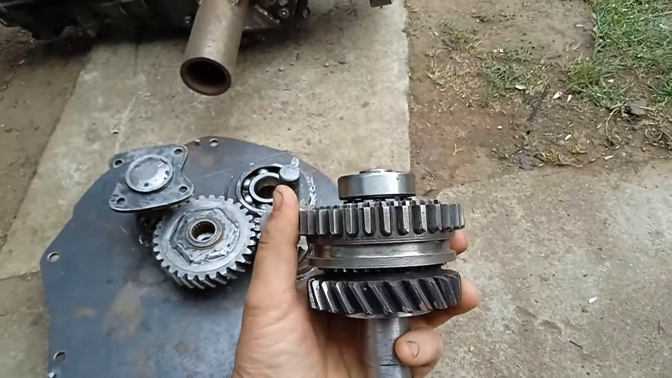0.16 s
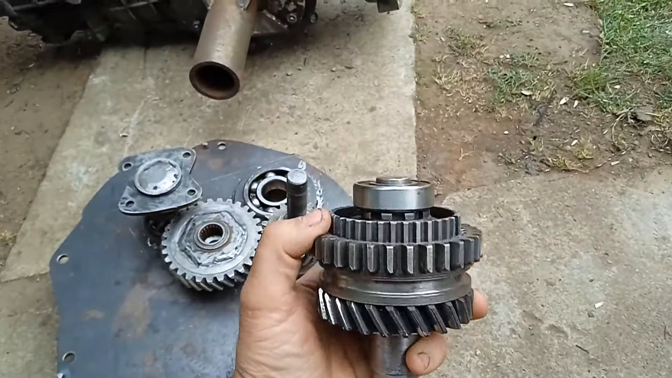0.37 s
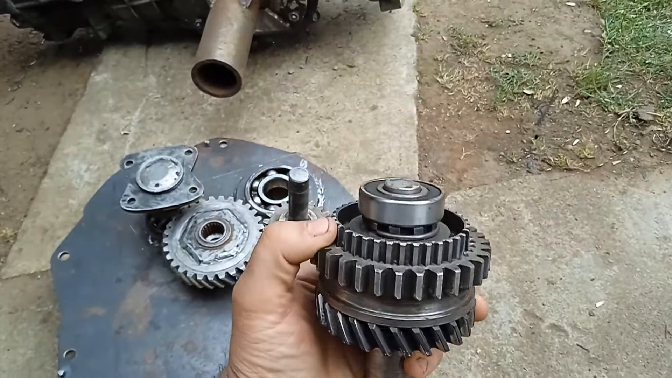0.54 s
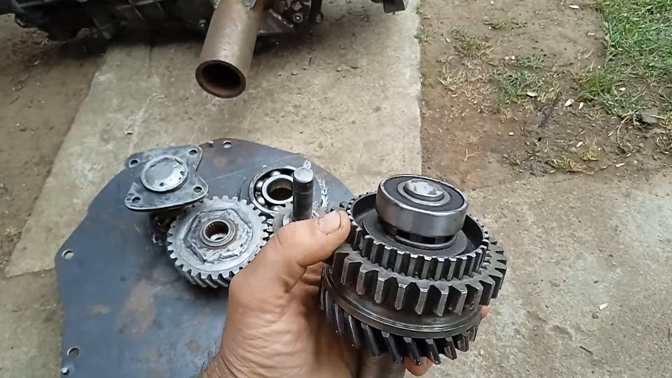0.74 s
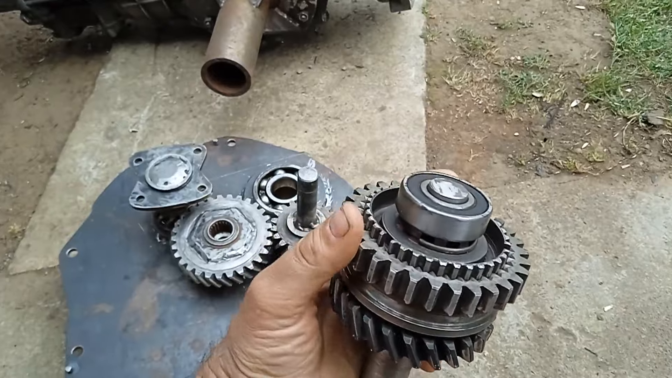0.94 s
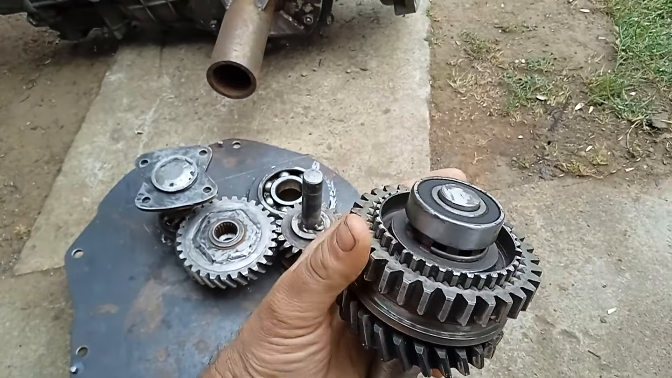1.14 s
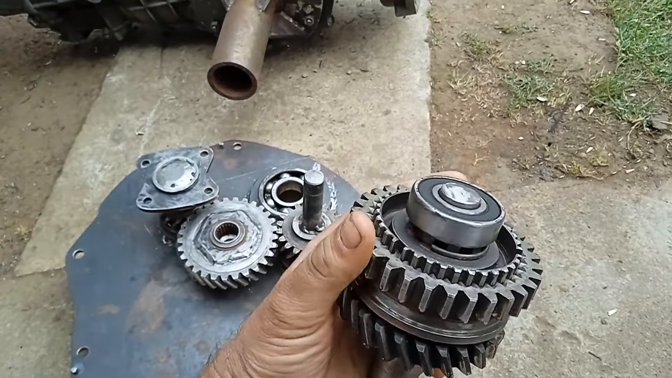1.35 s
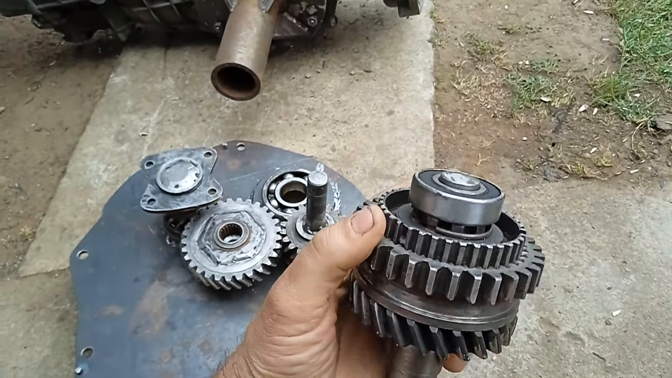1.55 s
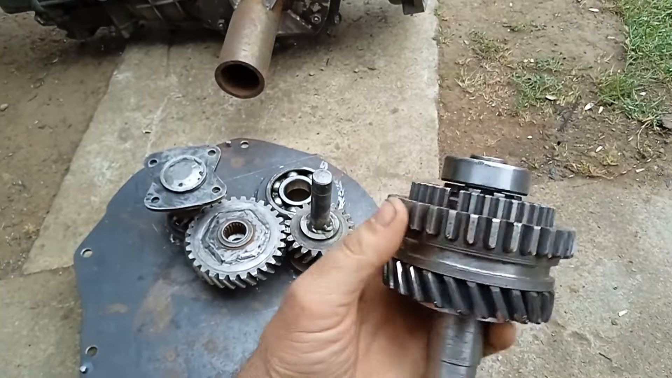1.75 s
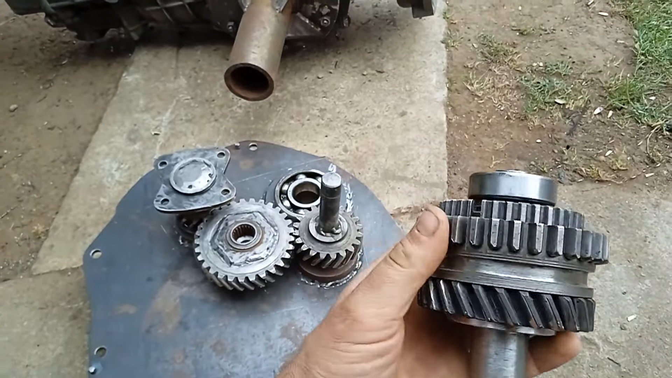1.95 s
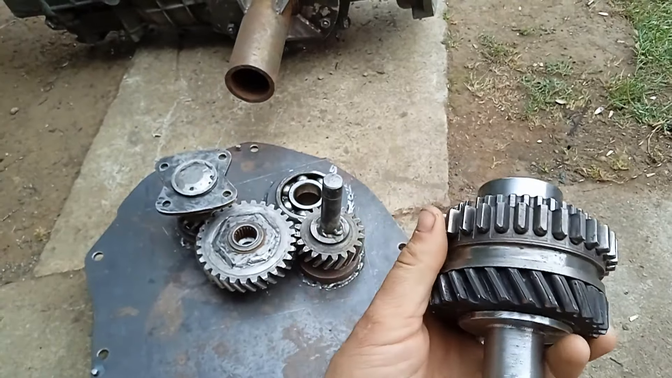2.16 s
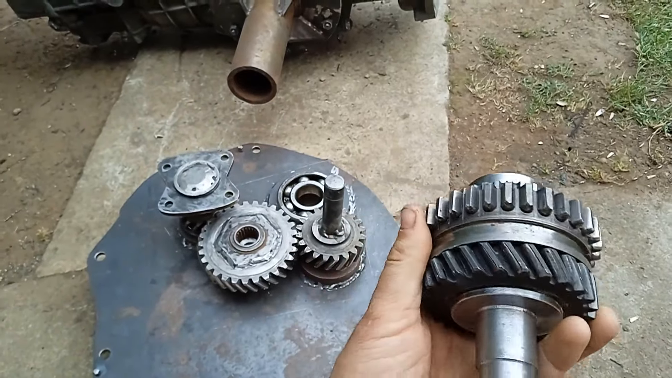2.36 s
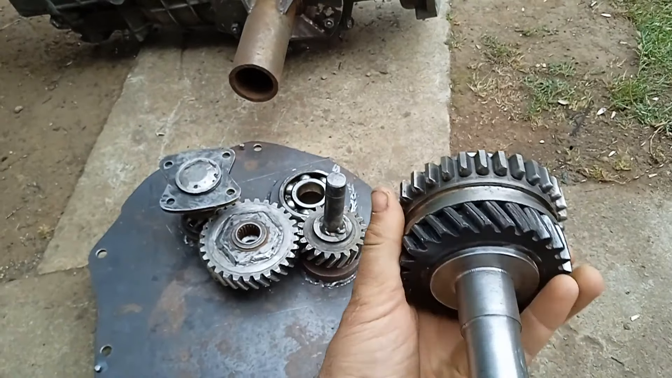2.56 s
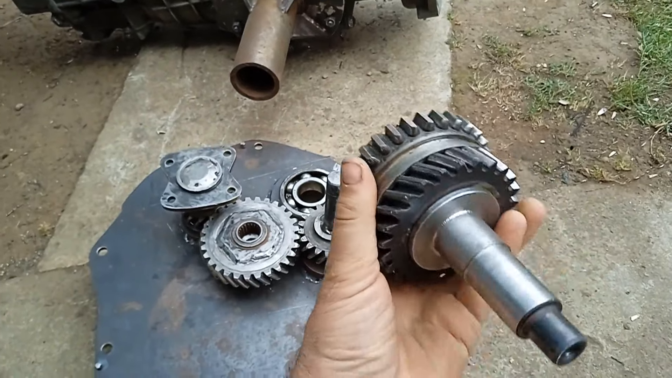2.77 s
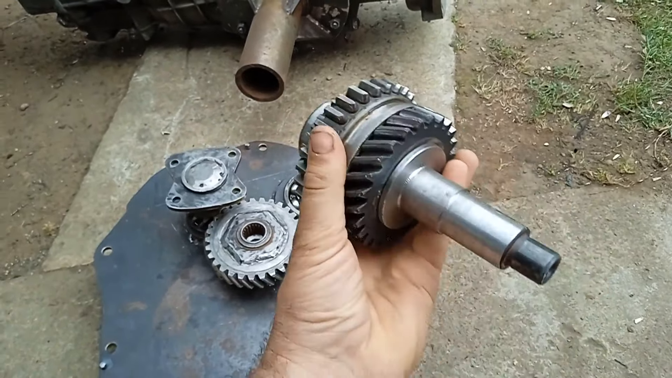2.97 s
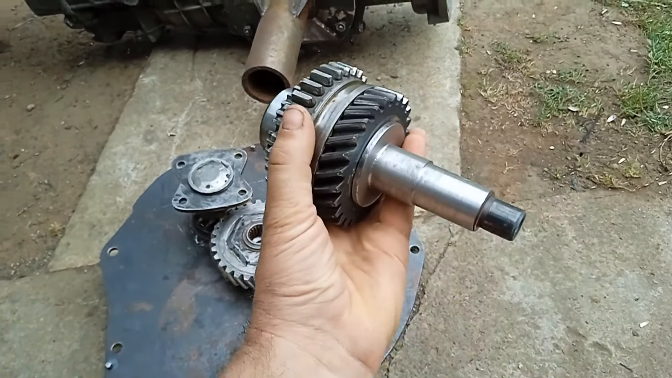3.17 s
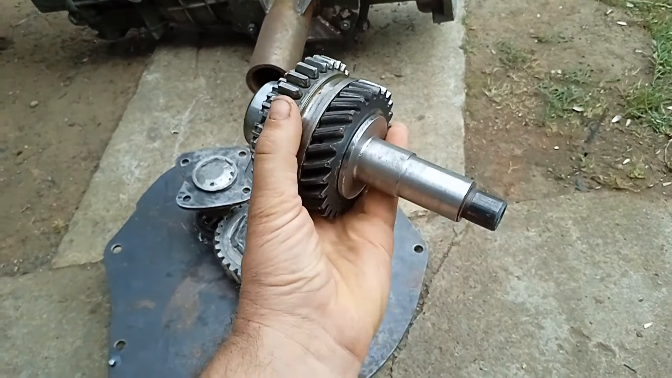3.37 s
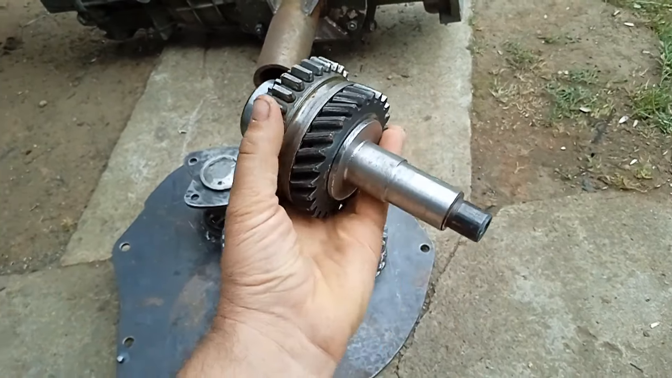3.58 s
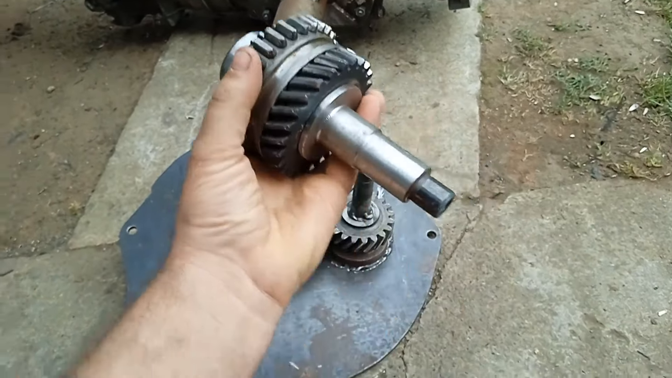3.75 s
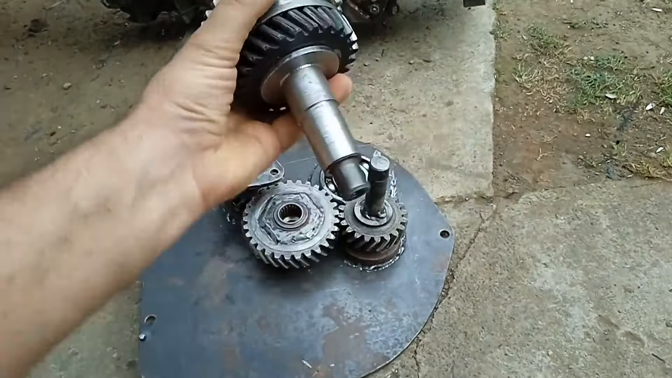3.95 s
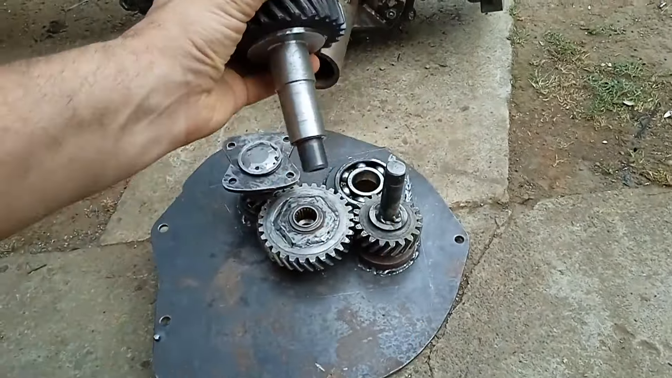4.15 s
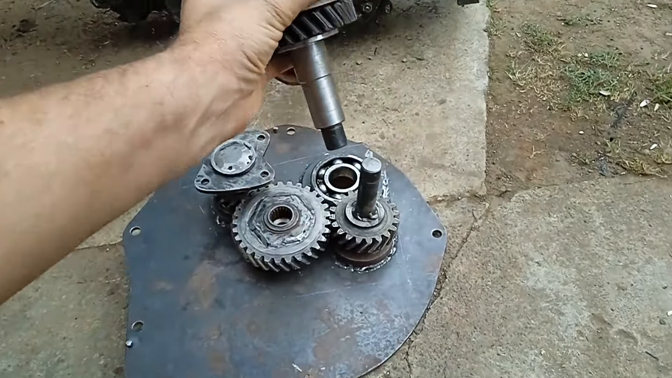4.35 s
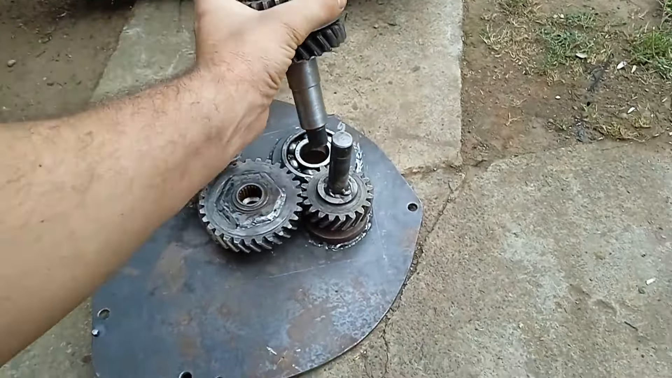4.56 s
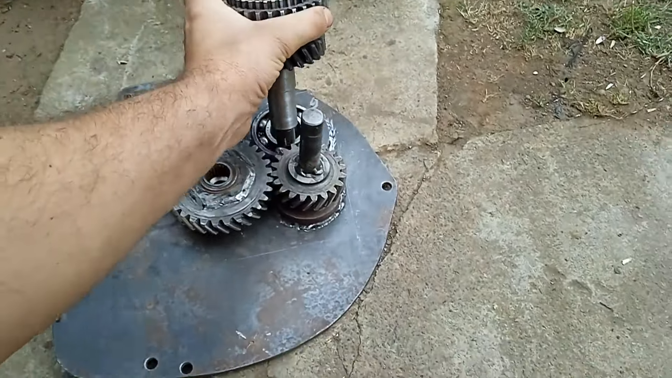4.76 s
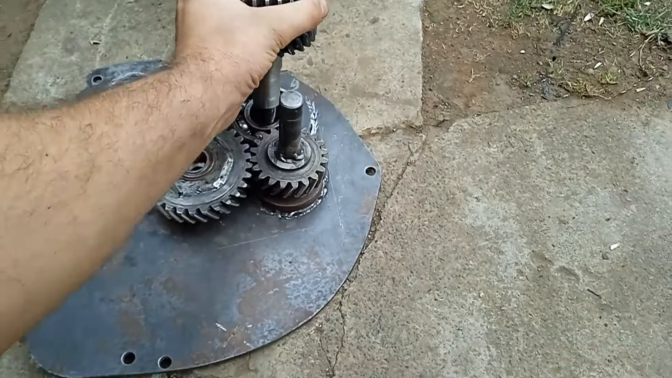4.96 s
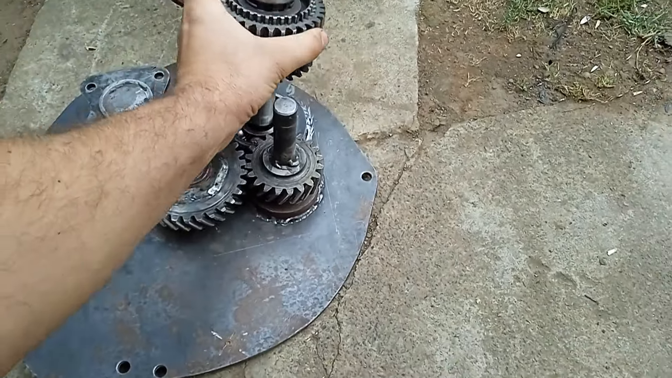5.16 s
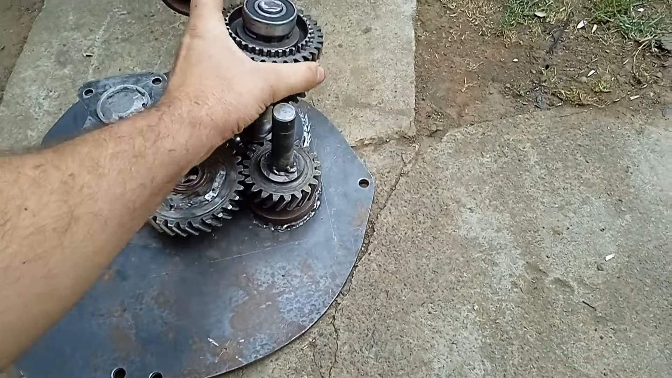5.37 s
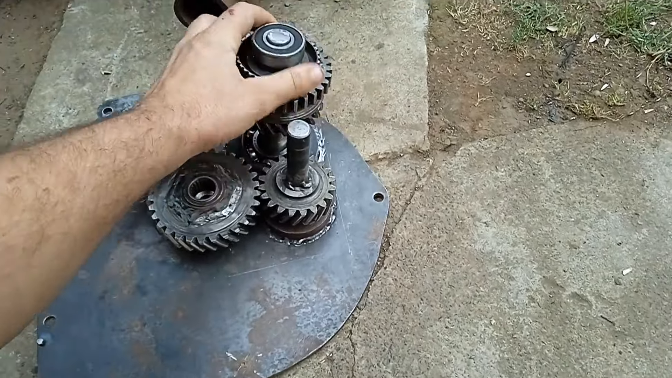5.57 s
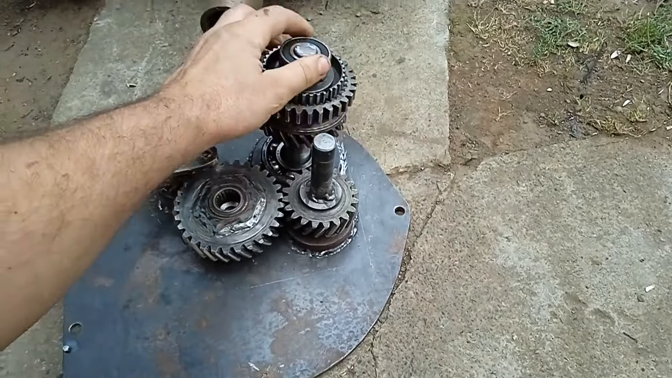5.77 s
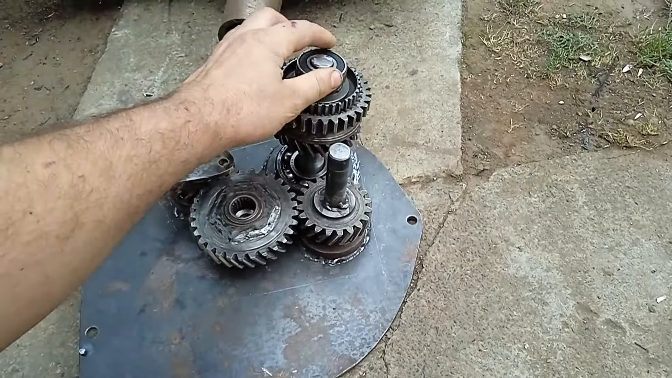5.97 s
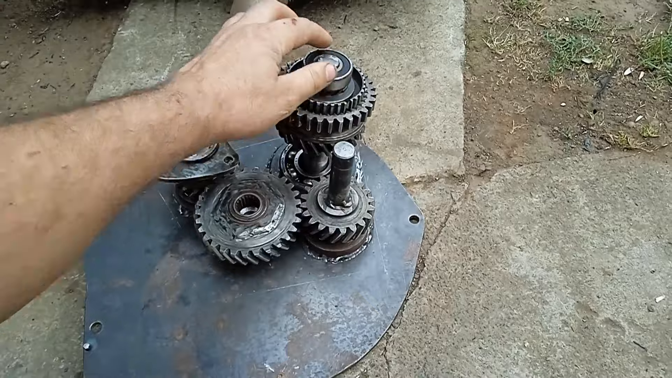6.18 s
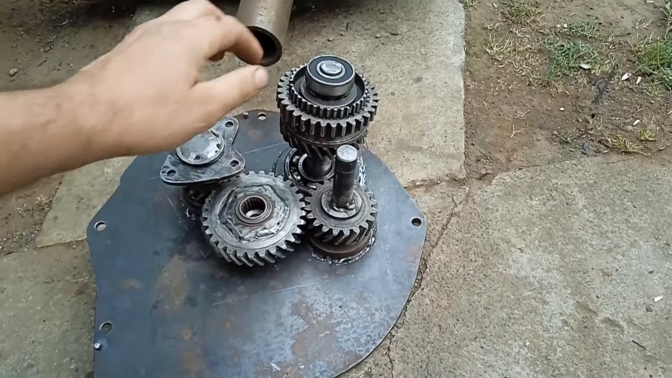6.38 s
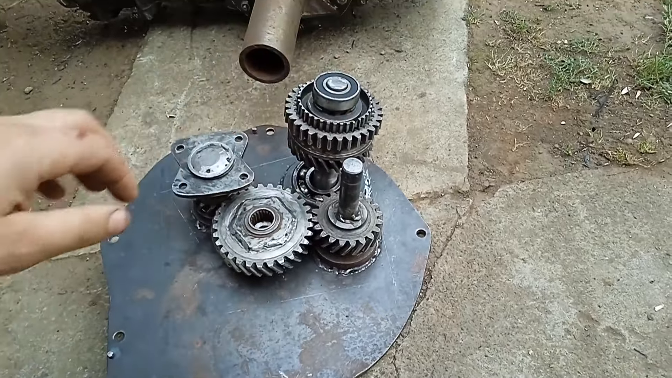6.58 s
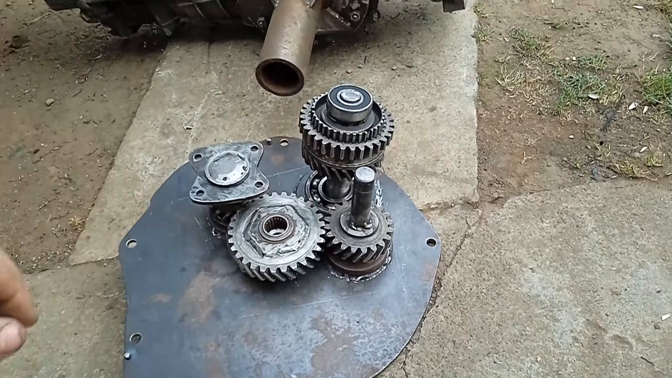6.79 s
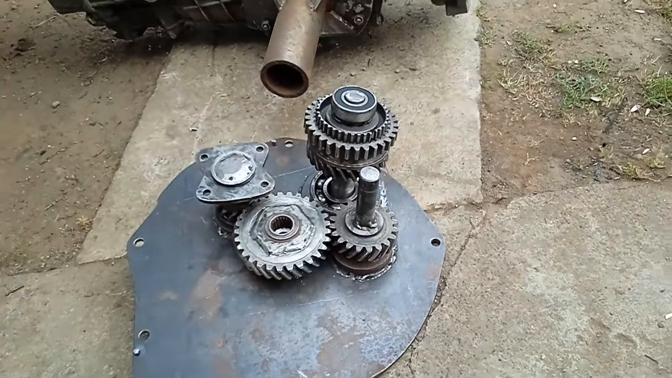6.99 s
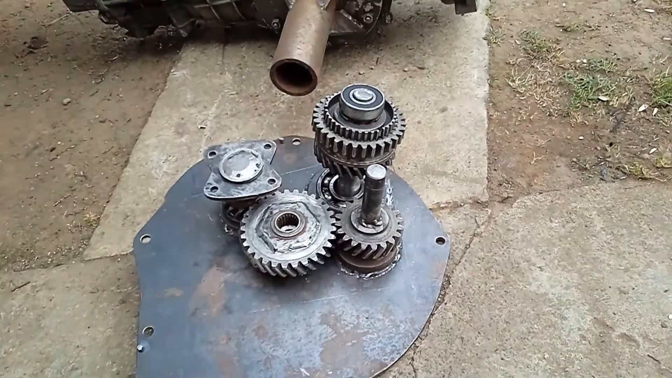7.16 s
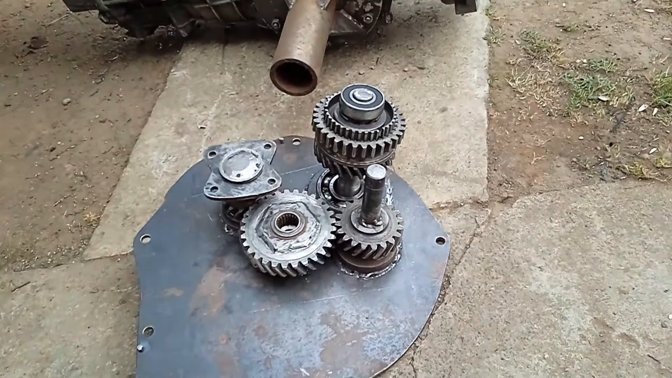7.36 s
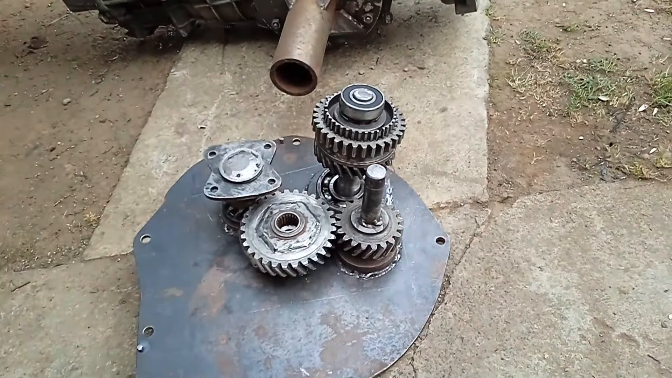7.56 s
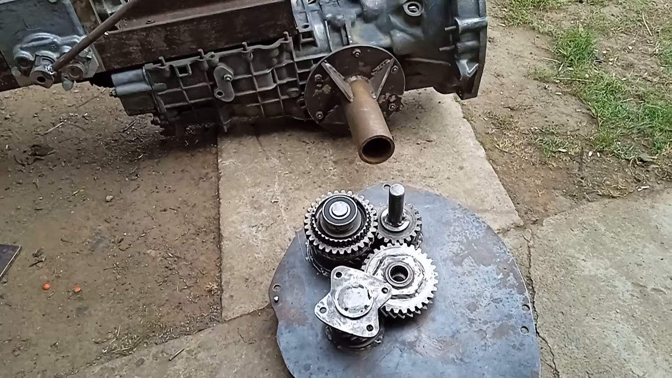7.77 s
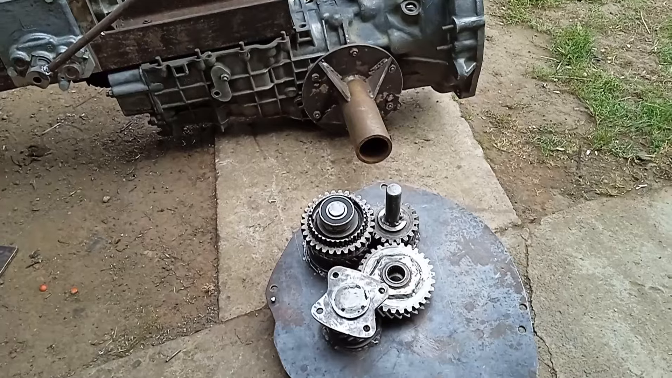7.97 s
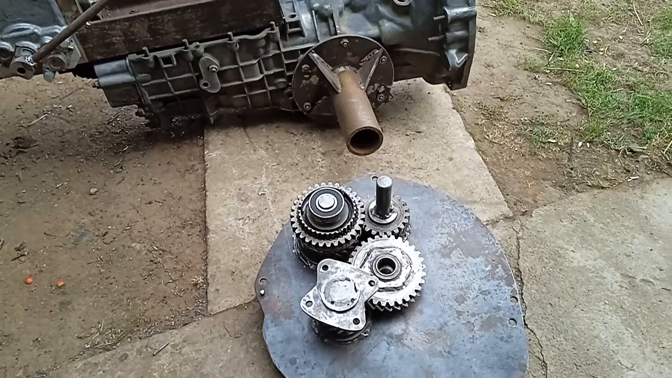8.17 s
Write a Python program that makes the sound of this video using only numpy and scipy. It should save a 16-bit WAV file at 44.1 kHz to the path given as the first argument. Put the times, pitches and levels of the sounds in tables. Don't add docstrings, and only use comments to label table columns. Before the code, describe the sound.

Outdoors, a heavy steel gear cluster clinks sharply in the hand, then its shaft knocks and grinds into a bearing on a steel plate; silence follows.

```python
import sys
import numpy as np
from scipy import signal
from scipy.fft import rfft, irfft
from scipy.io import wavfile

SR = 44100
rng = np.random.default_rng(int(sys.argv[2]) if len(sys.argv) > 2 else 0)


def boost(x):
    u = np.asarray(x, float) / 20
    return 10 ** u


def wrap_up_sound(samples):
    columns = np.atleast_2d(samples).T
    tamed = np.clip(columns, -1, 1)
    steps = np.round(tamed * 32767).astype(np.int16)
    wavfile.write(sys.argv[1], SR, steps)


N = 362805

# frequency in Hz, density in dB per Hz.
HISS_SPECTRUM = [(500, -22.5), (1100, -14), (1600, -5), (2300, -2), (4300, -7.5), (6100, -5.5),
                 (7300, -11.5), (8200, -25), (13300, -31), (15200, -24.5), (16300, -32)]
HUM_SPECTRUM = [(100, -9.5), (200, -1), (300, -2), (500, -4.5), (900, -5.5), (1300, -8.5), (2500, -36.5)]
WIND_SPECTRUM = [(25, -10), (50, -0.5), (90, 4), (150, -2), (250, -19), (500, -46.5)]
RUSTLE_SPECTRUM = [(3000, -31), (6000, 6), (8700, -15), (11000, -6.5), (13300, -13.5), (15200, 1.5),
                   (16300, -19.5)]
# time in seconds, level in dB.
FAR_HISS = [(0.0, -53), (.6, -55), (1.72, -58), (2.66, -62.5), (3.26, -62.5), (4.4, -64.5), (5.1, -64),
            (5.9, -67), (7.57, -66.5)]
# peak in seconds, level in dB.
HUM_SWELLS = [(.52, -61), (1.56, -68.5), (3.26, -68.5), (5.93, -68.5)]
# peak in seconds, level in dB, time to fall 20 dB in seconds.
GUSTS = [(.07, -51.5, 0.09), (.13, -56, 0.1135), (.515, -54, 0.0604), (.63, -65.5, 0.5),
         (2.09, -48.5, 0.0725), (2.25, -50, 0.082), (2.36, -64, 0.44), (2.69, -56, 0.1565),
         (2.92, -64, 0.2522), (3.07, -63.5, 0.1704), (3.29, -62.5, 0.0014), (4.09, -63.5, 0.1692),
         (4.83, -75, 0.5581), (5.8, -60.5, 0.4261), (6.055, -57.5, 0.4437), (7.11, -64, 0.1),
         (7.46, -67.5, 1.5)]
# middle in seconds, length in seconds, rustle level in dB, lift of the hiss in dB.
RUBS = [(2.6, 1, -72, 2.3975), (4.59, 0.3796, -70, 2.5), (5.482, 0.2698, -78.5, 2.5), (7.05, 0.4, -65, 2.5),
        (7.305, 0.28, -73, 1)]
# frequency in Hz, gain in dB.
MICROPHONE_COLOUR = [(300, -35.5), (1000, -19), (2300, 6.5), (4300, -2.5), (6100, 6), (8300, -16),
                     (11000, -20.5), (13300, -34.5), (15200, -12.5), (16400, -30.5)]
# start in seconds, peak in dB, t60 in seconds,
# tilt in dB per octave, rise in ms.
CRACKS = [(0.888, -34, 0.04166, -6, 3.368), (0.8897, -33.5, 0.01633, -1, 0.586),
          (1.461, -46.5, 0.2652, -1.5, 0.78), (1.843, -54.5, 0.117, -4.5, 0.62),
          (2.0251, -20.5, 0.02247, 2.5, 2), (2.0262, -13, .012, 2, .6), (2.03, -37, 0.20627, 0.5, 2.9),
          (3.233, -49, 0.2998, -0.5, 0.627), (4.597, -49.5, 0.1705, 3.5, 17.75),
          (5.036, -56.5, 0.2076, -9, 8), (5.069, -52.5, 0.0983, -17.5, 4.45),
          (5.624, -34.5, 0.0589, -8, 0.38), (5.742, -48.5, 0.13925, -4.5, 0.594),
          (5.7767, -38.5, 0.0383, -0.5, 1.3), (5.7915, -41, .03, -1, 0.6296),
          (5.7959, -36, 0.1298, -5.5, 1.56), (5.966, -56, 0.12, -8.5, 6), (6.026, -47, 0.15, -7.5, 1.5),
          (6.052, -46, 0.0474, 2.5, 2), (6.0585, -33, 0.0479, -7, 2.3),
          (6.0614, -34, 0.02205, -0.5, 0.5326), (6.1253, -37.5, 0.0433, -2, 1.5),
          (6.1297, -22.5, 0.01815, -1, 0.31), (6.131, -39.5, 0.1687, -2.5, 4.3),
          (6.209, -55, 0.2007, -12.5, 1.494)]
GEAR_HZ = [1985, 2315, 2590, 2950, 3170, 3400, 3432, 3470, 3595, 3700, 3852, 4800, 5150, 5383, 5455, 5487,
           5620, 5830, 6250, 6480, 6885, 8360, 8672, 8738, 8785, 10080, 10495, 10900, 11700, 12378, 13248,
           13660, 14590, 15190, 15662]
# level in dB within its family for a rim touch, full knock,
# landing and seated knock, then t60 in seconds.
GEAR_MODES = [(3.5, -12, 0, 3, .12), (-2, 0, -10, -7, .14), (0.5, -22, -10, -12, .058),
              (0, -20, -2, -13.5, .1), (-11, -14, -16, -16, 0.12), (-9, -8, 5, 0, 0.22),
              (0, -4.5, -2, 4.5, .25), (-7, -2.5, -3.5, -14.5, .25), (-4, -6, -17, -15.5, .24),
              (3.5, -7, -16, -11, .22), (-15.5, -12, -16, -13.5, .15), (-9, -18, -24, -21.5, .12),
              (12.5, -4, -16, -14.5, 0.1), (2.5, -10, -7, -1, 0.21), (1.5, -3, -12, 1, 0.2),
              (-9.5, 2, 0.5, -12, .25), (-10, -12, -10, -4, .1), (-10.5, -6, -18, -16, .1),
              (-16.5, -2, -9.5, -7.5, 0.12), (-11.5, -8, -16, -7, .11), (-8, -4, -20.5, -18, 0.13),
              (-23.5, -25, -20.5, -20.5, .088), (-14.5, -14, -12, -1, .12), (5, 4.5, -2, -9.5, .2),
              (0, -5, 0, -7.5, 0.14), (2.5, -12.5, -10, 0.5, 0.21), (-2, -0.5, -9, -9, .17),
              (-6.5, -10, -12, -6, .09), (-24, -24, -20, -12, .1), (-18, 3, -10.5, -13.5, .15),
              (-24, 2, -8, -20, 0.2), (-24, -2.5, -2, -28, 0.22), (-12, 4, -8, 2.5, .13),
              (-15, -16, -4, -4, .15), (-7, -9, 6, -4, .2)]
FAMILY_EDGES_HZ = [3000, 4300, 7500, 9500]
CONTACT_CHANGES_S = [1.5, 5.5, 6.1]
# start in seconds, then family strengths in dB near 3.5, 2, 5.5 and 8.7 kHz and on top.
CLINKS = [
    (0.8891, -31.5, -30, -36, -35.5, -45),
    (2.027, -19.5, -26, -28.5, -19.5, -23),
    (5.7968, -43, -61.5, -38, -69.5, -60.5),
    (6.0625, -41, -41.5, -27.5, -57, -57),
    (6.1265, -35, -54.5, -50, -55, -60),
    (6.1345, -27, -48, -39, -45, -50),
    (6.1305, -27, -40, -27, -28, -36),
]
# start in seconds, frequency in Hz, level in dB, t60 in seconds, rise in ms.
PINGS = [(2.011, 2086, -42, 0.08826, 1.368), (3.234, 4878, -42.5, 0.02755, 0.396),
         (3.58, 319.7, -65.5, 0.6363, 23.78), (5.038, 1737, -48.5, 0.0574, 5.113),
         (5.051, 1537, -37.5, 0.04583, 3.06), (5.055, 2971, -57.5, 0.0984, 5.43),
         (5.8, 179.7, -42.5, 0.0554, 2.68), (5.0735, 4920, -53.5, 0.05025, 4.47),
         (5.073, 451.6, -45, 0.0515, 6.71), (6.027, 1815, -34.5, 0.066, 3),
         (6.057, 2023, -28.5, 0.0603, 2.854), (6.21, 1510, -59.5, 0.3706, 16.66),
         (5.6235, 2900, -36, .05, 2), (5.624, 2460, -39, .09, 3), (5.625, 1590, -45, .14, 4),
         (5.623, 700, -44, .06, 2), (7.4742, 1900, -48, 0.01, 0.27), (5.748, 1900, -50, .1, 6),
         (2.0262, 3850, -17, .016, .8), (2.042, 2330, -36, .05, 3), (2.046, 5480, -36, .06, 3),
         (.908, 5420, -47, .07, 5), (6.129, 3750, -32, .04, 2), (6.026, 2600, -45, .07, 2),
         (6.026, 600, -40, .06, 3), (5.965, 3200, -52, .06, 3), (6.062, 700, -34, .08, 4),
         (6.212, 200, -48, .08, 4), (1.46, 653.1, -51.5, 0.05876, 2.615), (1.46, 951, -53.5, 0.0529, 2),
         (1.498, 697.2, -52, 0.02834, 1.848), (1.513, 724.2, -52, 0.0413, 2.79),
         (5.058, 297.5, -46, 0.03407, 1.91), (5.077, 4093, -52, 0.0301, 2.957),
         (5.072, 2095, -52, 0.02874, 2.963), (5.777, 6365, -34.5, 0.02285, 0.9),
         (5.7915, 6293, -38.5, .015, 0.989), (6.119, 2013, -39.5, 0.0438, 1.956)]
# time in seconds, peak in dB, pitch in Hz.
SKIN_TICKS = [(3.5944, -49, 3202), (4.4888, -42.5, 2349), (4.5004, -53, 2301), (4.5126, -53, 3309),
              (4.548, -52, 6271), (4.5282, -41, 6556), (4.556, -42.5, 6277), (4.6212, -44, 6587),
              (4.649, -44.5, 3113), (4.6765, -49, 3473), (4.68, -49.5, 2907), (4.7325, -48, 3521),
              (4.8194, -53.5, 1902), (4.8922, -46.5, 6534), (5.4048, -50.5, 6771), (5.4764, -49.5, 2326),
              (5.53, -44, 2046), (5.7187, -51.5, 1958), (6.241, -56, 2000), (6.8337, -46, 2453),
              (7.2914, -48.5, 3190), (7.399, -54, 4011), (7.4738, -54, 4000), (7.1915, -53, 2600),
              (7.1912, -56, 4300), (6.8342, -50, 3300), (7.4207, -50.5, 4077), (7.448, -52.5, 2600),
              (7.5243, -52, 3921), (7.5388, -48, 4026)]
# time in seconds, peak in dB, spit in dB, glint in dB.
GRIT_TICKS = [(2.202, -51, -59, -52), (2.2166, -55.5, -55.5, -49.5), (2.5546, -50.5, -67, -76.5),
              (4.0893, -62, -67, -76), (5.116, -52.5, -60.5, -72), (5.2527, -61, -68.5, -64),
              (5.4155, -67, -72.5, -65), (5.4314, -64, -71, -60.5), (5.4626, -66, -71, -54.5),
              (5.5386, -45, -63.5, -61), (5.565, -43.5, -56, -57), (5.583, -50.5, -65, -60.5),
              (5.599, -57.5, -68.5, -56), (5.665, -53.5, -77.5, -63.5), (6.241, -62.5, -62, -58),
              (6.303, -66.5, -78.5, -65), (6.537, -47, -56.5, -53.5), (6.8338, -50, -73.5, -54.5),
              (7.1912, -51.5, -67, -77.5), (7.4205, -45.5, -63.5, -68)]
# start in seconds, level in dB, frequency in
# Hz, length in cycles, sign of first swing.
THUDS = [(2.689, -49.5, 96.78, 2.604, 1), (2.91, -39, 71.2, 1.465, -1), (4.814, -47, 163, 1.311, 1),
         (5.795, -16.5, 223, 1.2348, 1), (6.0564, -15, 303.5, 1.924, -1), (7.111, -40.5, 155.6, 0.86, 1),
         (7.164, -53, 149.3, 1.67, 1), (7.4733, -26, 99.49, 0.693, -1), (7.4736, -28, 1600, 1.1, -1),
         (6.0635, -22, 300, 2.6, 1)]
# start in seconds, then force in dB at each of the frequencies below.
BLOWS = [(5.498, -69, -67, -54, -68), (5.623, -59, -53.5, -42, -46), (5.718, -51, -67.5, -60, -52.5),
         (5.741, -61, -57, -47, -73.5), (5.778, -53.5, -45, -41.5, -36), (5.797, -39, -35.5, -39, -36.5),
         (5.803, -38, -47, -44, -43.5), (5.82, -49.5, -51, -35.5, -44.5), (5.846, -47.5, -54.5, -45, -51),
         (5.965, -45.5, -47.5, -46.5, -58), (5.995, -44.5, -47.5, -52.5, -59.5),
         (6.026, -50, -43.5, -41.5, -44.5), (6.0577, -36.5, -32.5, -38.5, -42.5),
         (6.106, -47.5, -44.5, -69, -53), (6.129, -50, -47.5, -40.5, -33)]
BLOW_HZ = [220, 620, 1100, 2200]
# frequency in Hz, level in dB, t60 in seconds.
PLATE_MODES = [(117.78, -4.5, 0.27), (137.66, -4.5, 0.13), (174.88, -4.5, 0.15), (222.48, -1.5, 0.099),
               (255.17, -3.5, 0.09011), (322.66, -1, 0.11), (405.58, -12, 0.12008), (444.9, -13.5, 0.13),
               (528.95, -8, .12), (590.96, -8, 0.12), (661.03, -5, 0.11265), (742.75, -10, 0.069),
               (1031.7, -2, .12), (1100, -5.5, 0.13), (1158.8, -13, 0.12), (1456.5, -18.5, 0.12),
               (1580, -9, 0.14), (1712.5, -12.5, .1), (1869.7, -4.5, 0.049968), (1883.1, -9.5, 0.069),
               (2091.4, -17, 0.036), (2439.7, -13.5, 0.085), (2869.4, -8, 0.079885), (3146.2, -12, 0.11985)]
# time in seconds, level in dB.
GRIND = [
    (5.68, -74),
    (5.718, -80),
    (5.836, -59.5),
    (5.944, -55),
    (5.996, -49.5),
    (6.09, -44.5),
    (6.236, -59.5),
    (6.36, -77.5),
]
# delay in ms, level in dB.
ECHOES = [(21, -18.5), (27, -21), (43, -26.5)]
# time in seconds, gain in dB.
FADE_IN = [(8.12, -32.5), (8.15, -21.5), (8.23, -13)]

STOP_S, RESTART_S = 7.571, 8.12
SKIN_SPIT_DB, SKIN_GLINT_DB = -27.5, -25.5
GRIT_HZ = 6726.6
RUSTLE_BELOW_HISS_DB = -21.5
HUM_DB, HUM_FOLLOWS = -44.5, 0.44049
SWELL_S = 0.12
GUST_RISE_S, CALM_DB = .05, -77
SCRAPE_DB = 9
NEIGHBOUR_STEP, NEIGHBOUR_SHARE = .022, 0.5878


def in_time(rows):
    s, *columns = np.transpose(rows)
    return [np.interp(np.arange(N) / SR, s, c) for c in columns]


def rms_one(x):
    return x / np.sqrt(np.mean(x ** 2) + 1e-20)


def colour(x, spectrum, tilt_db=0):
    hz, db = np.transpose(spectrum)
    grid = np.maximum(np.fft.rfftfreq(4096, 1 / SR), 10)
    tilt_floor_hz = 1800 if tilt_db < 0 else 300
    tilt = tilt_db * np.log2(np.maximum(grid, tilt_floor_hz) / 4000)
    magnitude = boost(np.interp(np.log(grid), np.log(hz), db) + tilt)
    cepstrum = irfft(np.log(magnitude))
    cepstrum[1:2048] *= 2
    cepstrum[2049:] = 0
    response = irfft(np.exp(rfft(cepstrum)))
    return signal.fftconvolve(x, response)[:len(x)]


def drift(rate_hz):
    r = np.exp(-2 * np.pi * rate_hz / SR)
    wander = signal.lfilter([1], [1, -2 * r, r * r], rng.standard_normal(N + SR))
    return rms_one(wander[SR:])


def waver(t, rate_hz, count):
    knots = rng.standard_normal((count, 400))
    return np.array([np.interp(t * rate_hz, np.arange(400), k) for k in knots])


def dying(t, t60, rise_ms):
    build_up = 1 - np.exp(-t * 1000 / max(rise_ms, .05))
    return build_up * boost(-60 * t / t60)


def add(track, s, sound):
    i = round(s * SR)
    track[i:i + len(sound)] += sound[:N - i]


def swells(rows, rise_s, floor_db):
    t = np.arange(N) / SR
    power = boost(floor_db) ** 2
    for s, db, fall_s in rows:
        away = np.maximum((s - t) / rise_s, (t - s) / fall_s)
        power = power + boost(db - 20 * away) ** 2
    return 10 * np.log10(power)


def rubbing(idle_db):
    t, gain, lift_db = np.arange(N) / SR, boost(idle_db), 0
    for s, length, db, hiss_db in RUBS:
        hump = np.cos(np.pi * np.clip((t - s) / length, -.5, .5)) ** 2
        gain = gain + boost(db) * hump
        lift_db = lift_db + hiss_db * hump
    return gain, lift_db


def air():
    far_db, = in_time(FAR_HISS)
    rub, lift_db = rubbing(far_db + RUSTLE_BELOW_HISS_DB)
    hum_rows = [(s, db, 2 * SWELL_S) for s, db in HUM_SWELLS]
    hum_db = swells(hum_rows, SWELL_S, HUM_DB + HUM_FOLLOWS * far_db) + 0.5 + 1.8 * drift(11.0)
    hiss_db = far_db + lift_db - 0.8887 + .5 * drift(3.394)
    wind_db = swells(GUSTS, GUST_RISE_S, CALM_DB) - 1.0 + 2.4 * drift(18)
    rustle_db = -1.5 + 1.3 * drift(25)
    white = rng.standard_normal((4, N))
    hiss = boost(hiss_db) * rms_one(colour(white[0], HISS_SPECTRUM))
    wind = boost(wind_db) * rms_one(colour(white[1], WIND_SPECTRUM))
    rustle = rub * boost(rustle_db) * rms_one(colour(white[2], RUSTLE_SPECTRUM))
    hum = boost(hum_db) * rms_one(colour(white[3], HUM_SPECTRUM))
    return hiss + hum + wind + rustle


def cracks():
    out, t = np.zeros(N), np.arange(SR // 3) / SR
    for s, db, t60, tilt_db, rise_ms in CRACKS:
        white = rng.standard_normal(len(t))
        noise = rms_one(colour(white, MICROPHONE_COLOUR, tilt_db))
        add(out, s, boost(db) * dying(t, t60, rise_ms) * noise)
    return out


def gears():
    out, t = np.zeros(N), np.arange(SR // 3) / SR
    modes, hz = np.array(GEAR_MODES), np.array(GEAR_HZ)[:, None]
    t60 = modes[:, 4:]
    family = np.searchsorted(FAMILY_EDGES_HZ, GEAR_HZ)
    for s, main, low, mid, high, top in CLINKS:
        contact = np.searchsorted(CONTACT_CHANGES_S, s)
        head_share = [0.1859, 0.21895, 0.23, .27][contact]
        rise_ms = [3.313, 3.5, 2.5, 5][contact]
        remnant_gain = [.13, .15, .25, .19][contact]
        family_db = np.array([low, main, mid, high, top - 4])[family]
        strength = boost(family_db + modes[:, contact])[:, None]
        head = dying(t, head_share * t60, rise_ms)
        sway = 0.42 + .5 * waver(t, 130, count=len(hz))
        remnant = sway * dying(t, 1.1 * t60, rise_ms=16)
        envelope = 1.41 * head + remnant_gain * remnant
        add(out, s - .001, np.sum(strength * envelope * np.sin(2 * np.pi * hz * t), axis=0))
    return out


def pings():
    out, t = np.zeros(N), np.arange(SR // 3) / SR
    for (s, hz, db, t60, rise_ms), grain in zip(PINGS, waver(t, 190, count=len(PINGS))):
        ring = dying(t, t60, rise_ms) * np.sin(2 * np.pi * hz * t)
        add(out, s, boost(db) * (1 + 0.33 * grain) * ring)
    return out


def ticks():
    out, t = np.zeros(N), np.arange(SR // 40) / SR
    bright = signal.butter(2, [7500, 12500], "band", fs=SR, output="sos")
    topmost = signal.butter(2, [14500, 16600], "band", fs=SR, output="sos")
    rows = [(s, db, hz, db + SKIN_SPIT_DB, db + SKIN_GLINT_DB) for s, db, hz in SKIN_TICKS]
    rows += [(s, db, GRIT_HZ, spit_db, glint_db) for s, db, spit_db, glint_db in GRIT_TICKS]
    for s, db, hz, spit_db, glint_db in rows:
        white = rng.standard_normal((3, len(t)))
        body = np.sin(2 * np.pi * hz * t) * dying(t, 0.007877, rise_ms=0.2041)
        noise = rms_one(colour(white[0], MICROPHONE_COLOUR))
        snap = 0.43446 * noise * dying(t, 0.015583, rise_ms=0.2146)
        spit = boost(spit_db + 10.0) * signal.sosfilt(bright, white[1])
        glint = boost(glint_db + 11) * signal.sosfilt(topmost, white[2])
        spray = (spit + glint) * dying(t, 0.012314, rise_ms=0.15194)
        add(out, s - .0005, boost(db + 3.0) * (body + snap) + spray)
    return out


def thuds():
    out, t = np.zeros(N), np.arange(SR // 10) / SR
    for s, db, hz, cycles, swing in THUDS:
        envelope = dying(t, 2.869 * cycles / hz, rise_ms=700 / hz)
        add(out, s, np.sign(swing) * boost(db + 11) * envelope * np.sin(2 * np.pi * hz * t))
    return out


def shaft_slips():
    n = np.arange(N)
    sliding = (n > GRIND[0][0] * SR) & (n < GRIND[-1][0] * SR)
    burst_db = 2.1 * np.minimum(rng.exponential(1, N), 4)
    return sliding * boost(in_time(GRIND)[0] + burst_db) * (rng.random(N) < 900 / SR)


def plate():
    slips = shaft_slips()
    blows = np.array(BLOWS)
    lags = rng.random((len(blows), 4)) ** 2 * .012 * [0, 1, 1, 1]
    contact_gain = np.array([0.7919, 0.6489, 0.47, 0.12])
    at = np.round((blows[:, :1] + lags) * SR).astype(int)
    luck = rng.standard_normal((len(blows), len(PLATE_MODES), 5, 4))
    first, out = round(5 * SR), np.zeros(N)
    rocking = 1 + 0.39 * waver(np.arange(N - first) / SR, 70, count=len(PLATE_MODES))
    for k, (hz, level_db, t60) in enumerate(PLATE_MODES):
        blow_db = [np.interp(np.log(hz), np.log(BLOW_HZ), row[1:]) for row in blows]
        blow = boost(blow_db)[:, None]
        grain = rng.standard_normal(N)
        for twin, step in enumerate(range(-2, 3)):
            force = slips * boost(-22.5) * np.roll(grain, twin) + 1e-18
            chance = np.sign(luck[:, k, twin]) + 0.315 * luck[:, k, twin]
            np.add.at(force, at, 0.5 * blow * chance * contact_gain)
            r = boost(-60 / (t60 * SR))
            w = 2 * np.pi * hz * (1 + NEIGHBOUR_STEP * step) / SR
            gain = NEIGHBOUR_SHARE ** abs(step) * boost(level_db + 2.5) * np.sin(w)
            ring = signal.lfilter([0, gain], [1, -2 * r * np.cos(w), r * r], force[first:])
            out[first:] += rocking[k] * ring
    band = signal.butter(1, [150, 2500], "band", fs=SR, output="sos")
    scrape = signal.sosfilt(band, slips * rng.standard_normal(N))
    return out + boost(SCRAPE_DB) * scrape


def surroundings(x):
    dull, out = signal.lfilter([.6], [1, -.4], x), x.copy()
    for ms, db in ECHOES:
        add(out, ms / 1000, boost(db) * dull)
    return out


def scene():
    middle_band = signal.butter(2, [85, 4500], "band", fs=SR, output="sos")
    heavy = signal.sosfilt(middle_band, plate() + thuds())
    echoed = surroundings(cracks() + gears() + heavy)
    return (air() + echoed + pings() + ticks())[None]


def top_cut(x):
    return signal.sosfilt(signal.butter(12, 16600, fs=SR, output="sos"), x)


def record(dry):
    t = np.arange(N) / SR
    gate = (t < STOP_S) + (t > RESTART_S) * boost(in_time(FADE_IN)[0])
    cut = signal.sosfilt(signal.butter(2, 60, "high", fs=SR, output="sos"), dry)
    cut = signal.sosfilt(signal.cheby2(10, 60, 16900, fs=SR, output="sos"), cut)
    return top_cut(gate * cut)


dry = scene()
out = record(dry)
wrap_up_sound(out)
```